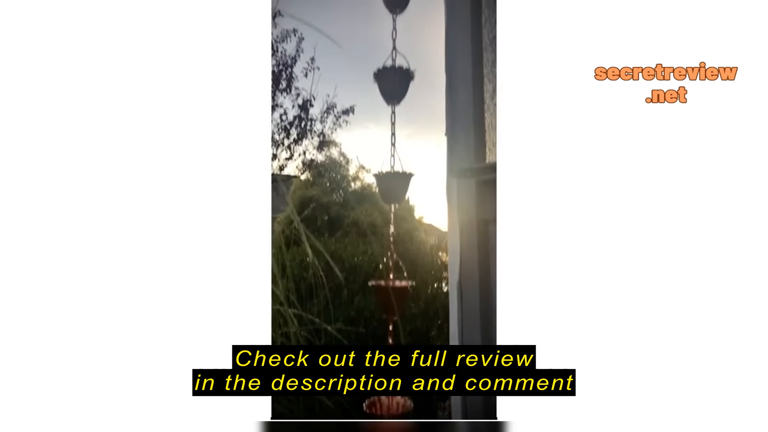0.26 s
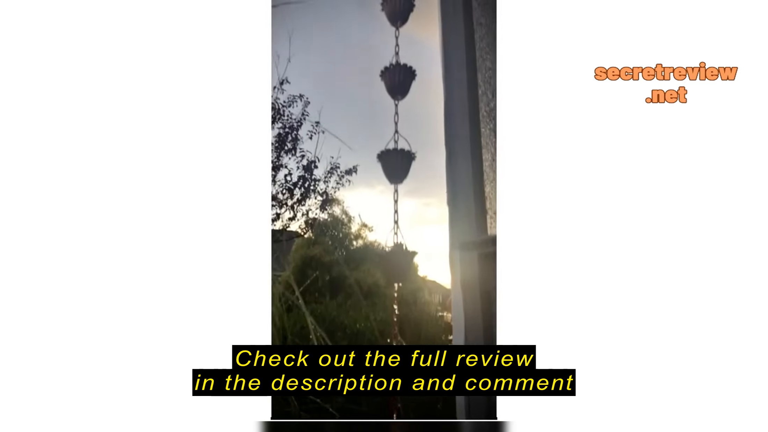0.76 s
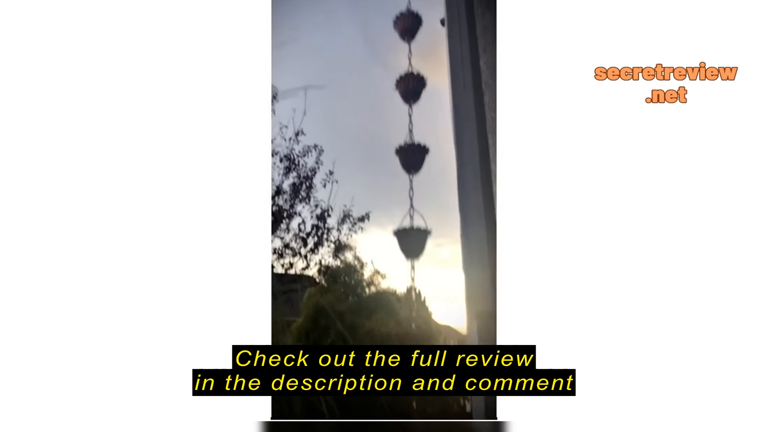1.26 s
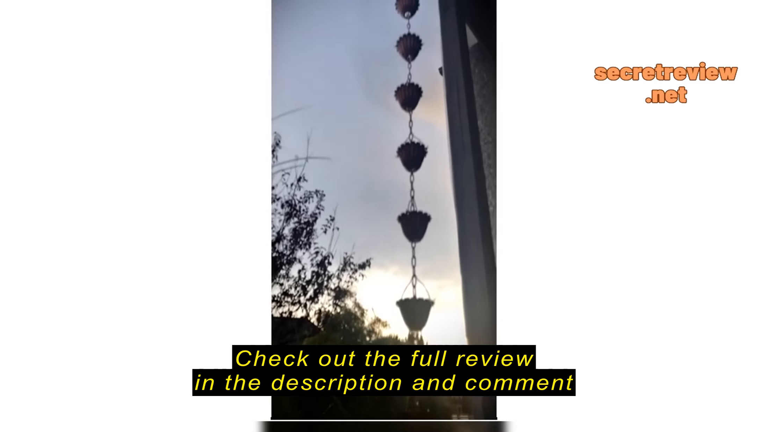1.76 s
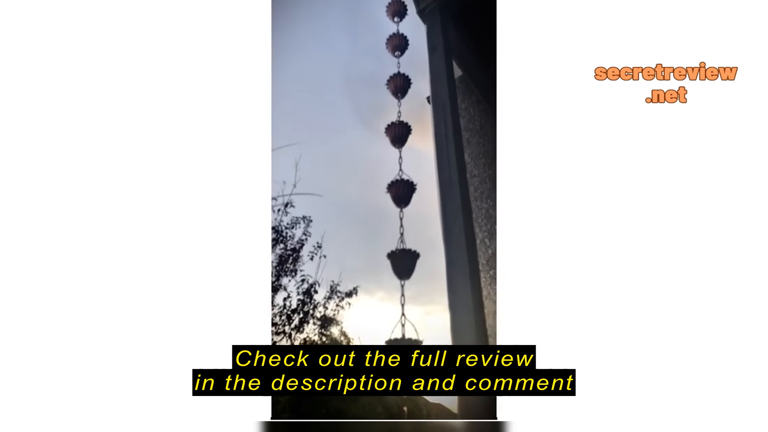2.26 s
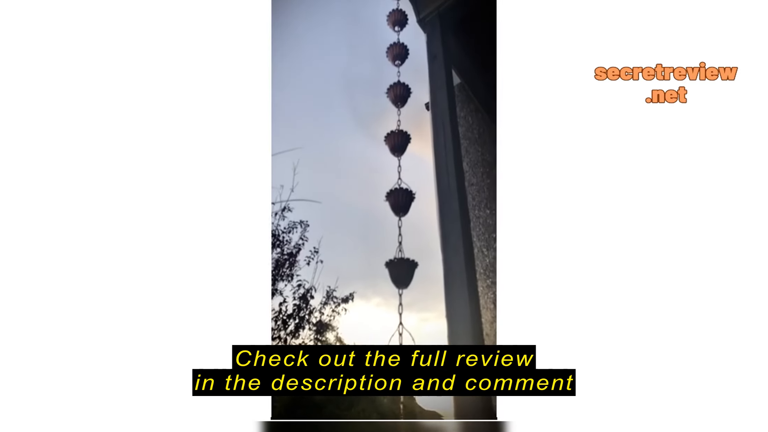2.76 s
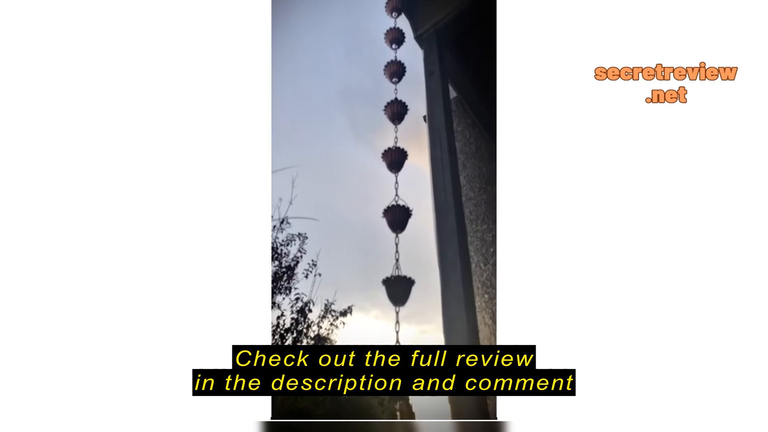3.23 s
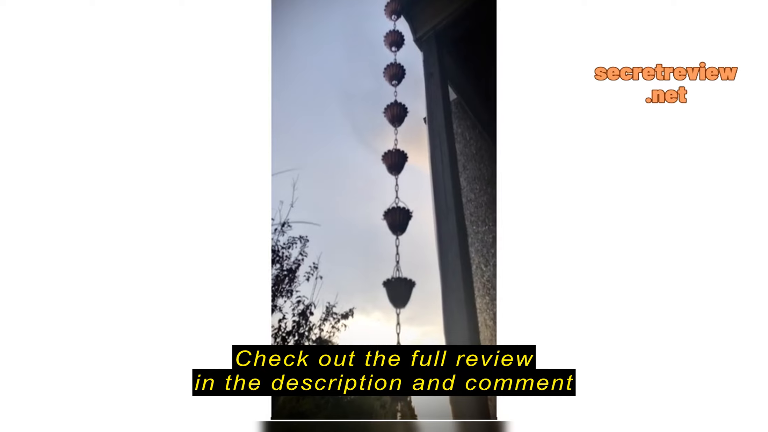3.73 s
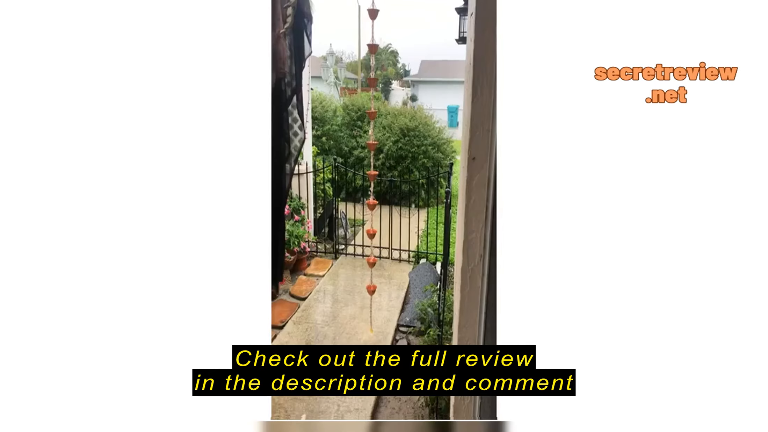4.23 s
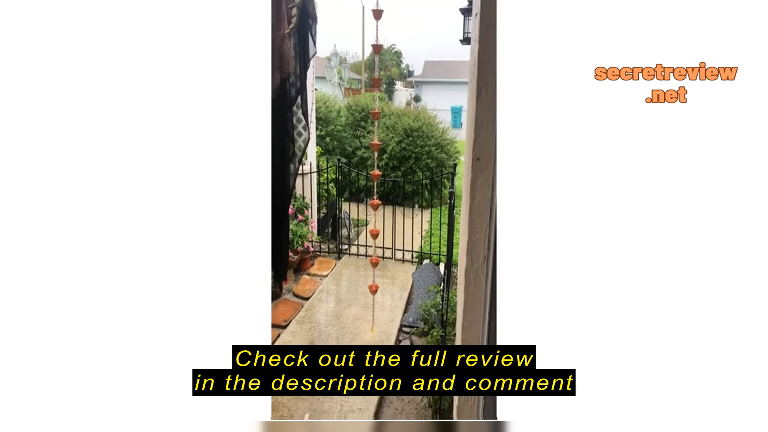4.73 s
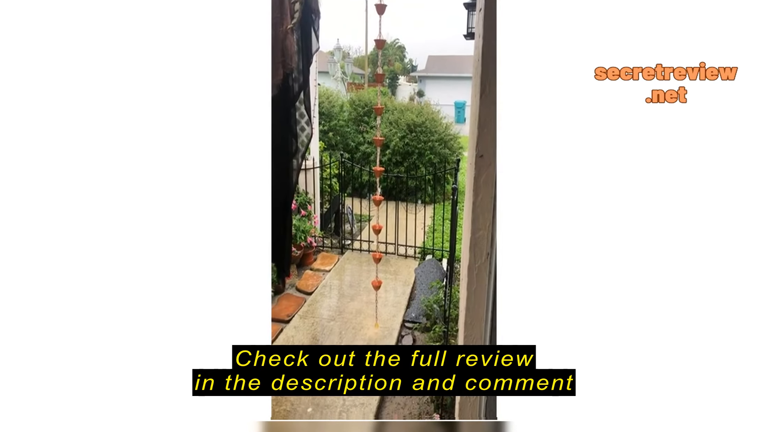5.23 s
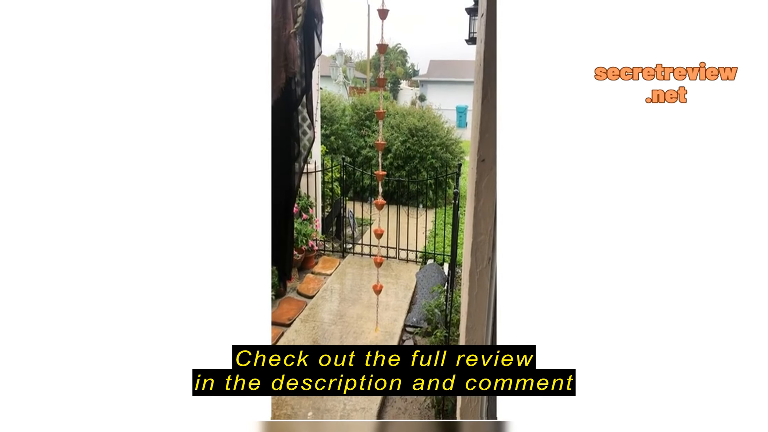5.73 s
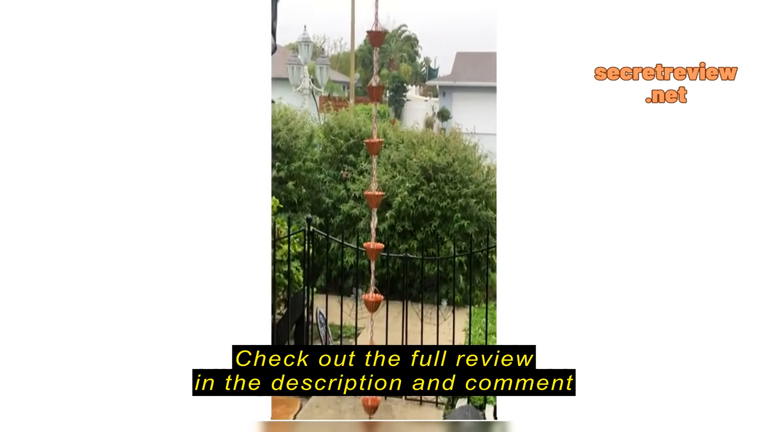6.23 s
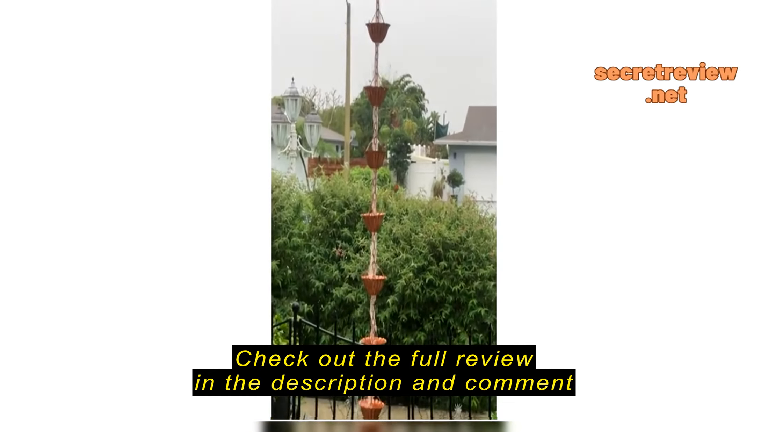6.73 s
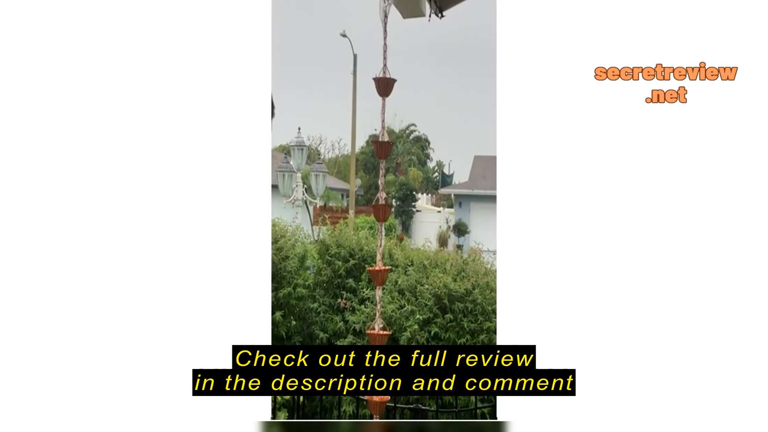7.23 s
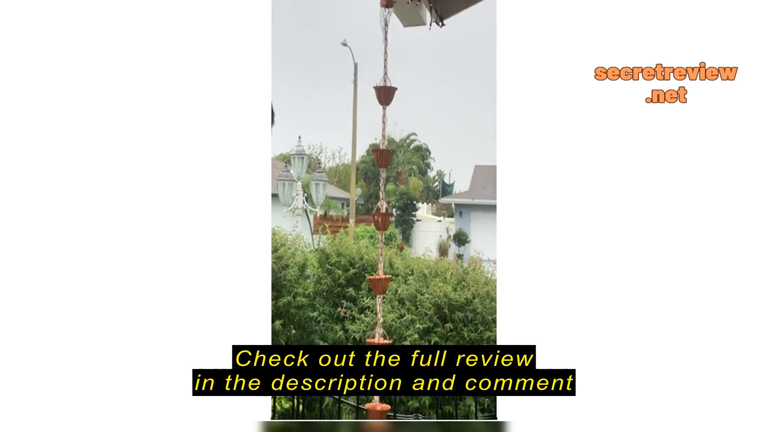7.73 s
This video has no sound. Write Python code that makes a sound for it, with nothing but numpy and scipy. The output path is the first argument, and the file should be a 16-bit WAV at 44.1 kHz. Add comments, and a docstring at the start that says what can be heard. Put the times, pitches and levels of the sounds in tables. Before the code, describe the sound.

Outdoors under the eaves, isolated drips plink into small copper cups with short upward chirps and tiny metallic ticks, over a soft far-off traffic murmur and faint machine tones. Around four seconds there is a very brief silence, then steady rain hiss starts at once, with water gurgling, pattering and splatting down the chain close by. An air conditioner hums low. The porch adds a short echo; identical sound in both channels.

```python
"""Single drips plink into the cups of a copper rain chain at a house's eaves, at dusk, over a far-off murmur.
After a short silence a second scene starts, in steady rain: water gurgles, spatters and splats down the chain.
Drips and drops are short decaying rings, many rising in pitch, and the porch walls echo them.
The murmur and the garden rain are filtered noise; distant machines and a nearby air conditioner are
unsteady tones. The microphone keeps neither the deepest rumble nor the extreme treble."""
import sys
import numpy as np
from scipy import signal
from scipy.fft import rfft, irfft
from scipy.io import wavfile
from scipy.ndimage import uniform_filter1d, map_coordinates

SR = 44100
rng = np.random.default_rng(int(sys.argv[2]) if len(sys.argv) > 2 else 0)


def inscribe(sig):
    """Save sig as 16-bit PCM at rate SR to the path in sys.argv[1].

    A 1-D sig is mono; a 2-D sig holds one channel per row.
    Samples are clipped to [-1, 1] before scaling.
    """
    pcm = np.round(np.clip(np.atleast_2d(sig).T, -1, 1) * 32767)
    wavfile.write(sys.argv[1], SR, pcm.astype(np.int16))


N = 351918
DUSK_END_S, RAIN_START_S = 3.988, 4.056
SHOWER_S = N / SR - RAIN_START_S
TOP_HZ = 15900  # upper limit of the microphone


def undb(db):
    """Decibels to gain."""
    return 10 ** (np.asarray(db) / 20)


def level(x, db):
    """Scale to an rms level in dB."""
    return x * undb(db) / np.sqrt(np.mean(x ** 2))


def rain_level(x):
    """Scale to a standard deviation of 1 over the time of the shower."""
    return x / np.std(x[int(RAIN_START_S * SR):])


def curve(rows):
    """Join (s, value) rows by straight lines."""
    return np.interp(np.arange(N) / SR, *np.transpose(rows))


def walk(rate):
    """Random levels held 1 / rate s and smoothed twice; spread near 1."""
    hold = int(SR / rate)
    steps = np.repeat(rng.standard_normal(N // hold + 1), hold)
    smooth = uniform_filter1d(uniform_filter1d(steps, hold), hold)
    return 1.301 * smooth[:N]


def colour(x, points):
    """Causal minimum-phase filter with the given (Hz, dB) response, built from its cepstrum."""
    hz, db = np.transpose(points)
    bins = np.maximum(np.arange(N // 2 + 1) * SR / N, 1)
    response_db = np.interp(np.log(bins), np.log(hz), db)
    cepstrum = irfft(np.log(undb(response_db)), N)
    # fold the backward half of time onto the forward half
    cepstrum[1:N // 2] *= 2
    cepstrum[N // 2 + 1:] = 0
    return irfft(rfft(x) * np.exp(rfft(cepstrum)), N)


def add(out, s, sound):
    """Mix a sound in at time s."""
    i = min(max(int(s * SR), 0), N)
    out[i:i + len(sound)] += sound[:N - i]


def grain(hz, cycles, glide, swell):
    """A ring under an envelope of peak 1 that swells and dies away, rising in pitch by the share glide."""
    hz = min(hz, .45 * SR)
    # age reaches 1 after the given number of cycles
    age = np.arange(int(2 * cycles * SR / hz) + 2) * hz / (SR * cycles)
    shape = age ** swell * np.exp(-2 * np.pi * age)
    return shape / shape.max() * np.sin(2 * np.pi * cycles * (age + glide * age ** 2 / 2))


def porch(x, t60, wet_db):
    """Direct sound, then the short dense echo of walls and roof, whose pattern shifts as the microphone sways."""
    t = np.arange(SR // 3) / SR
    sway = 2 * np.pi * np.cumsum(1 + .4 * walk(2)) / SR
    dull = signal.butter(1, min(9000, TOP_HZ), fs=SR, output="sos")
    echo = 0
    # four echo patterns take turns, about one round a second
    for k, noise in enumerate(rng.standard_normal((4, len(t)))):
        tail = noise * undb(-60 * t / t60) * (1 - np.exp(-t / 0.00056))
        tail = signal.sosfilt(dull, tail)
        share = np.maximum(np.cos(sway + k * np.pi / 2), 0)
        echo = echo + share * signal.oaconvolve(x, tail / np.linalg.norm(tail))[:N]
    return x + undb(wet_db) * echo


def hum(hz, db, wander_hz, waver_db):
    """One machine tone, unsteady in pitch and strength."""
    phase = np.cumsum(hz + wander_hz * walk(9)) / SR + rng.random()
    return np.sqrt(2) * undb(db + waver_db * walk(4.05)) * np.sin(2 * np.pi * phase)


# The neighbourhood at dusk, far from the porch. Each row: frequency in Hz, relative level in dB per Hz.
MURMUR_SPECTRUM = [(25, -13), (42, -7.5), (70, 2), (250, -5), (420, -9), (580, -14), (900, -13.5),
                   (1500, -20), (3200, -26.5), (5800, -30), (6200, -28), (6700, -33.5), (10000, -37),
                   (15000, -46.5)]


def neighbourhood():
    """Traffic far off blends into one noise, coloured by its spectrum and wavering in level."""
    murmur = level(colour(rng.standard_normal(N), MURMUR_SPECTRUM), db=-46.5)
    return murmur * undb(.4 * walk(5))


# Machines in the distance. Each row: pitch in Hz, level in dB at first, level in dB at the end of dusk,
# wander of the pitch in Hz.
FAR_TONES = [(118.6, -52.5, -54, 4.01), (1236, -80, -68, 1.04), (1286, -79, -76, 0.96), (5010, -83, -77, 2),
             (5200, -80, -80, 1.9)]
# A far-off whine that swells and fades. Each row: time in seconds, level in dB.
FAR_WHINE = [(0, -72), (2.3, -60.5), (2.6, -58), (3.0, -63), (3.27, -52.5), (3.55, -61.5), (3.8, -57),
             (4, -61.5)]


def distant_machines():
    """Far machines give unsteady tones that drift in strength, and one whine that comes and goes."""
    machines = 0
    for hz, first_db, last_db, wander_hz in FAR_TONES:
        db = curve([(0, first_db), (DUSK_END_S, last_db)])
        machines = machines + hum(hz, db, wander_hz, waver_db=2.0)
    return machines + hum(hz=379.0, db=curve(FAR_WHINE), wander_hz=4.47, waver_db=3.0)


# Rain on the garden, beyond the porch. Each row: frequency in Hz, relative level in dB per Hz.
RAIN_SPECTRUM = [(25, -15), (48, 2), (75, 4.5), (150, 5), (230, 0.5), (320, -2), (520, -2), (700, -4.5),
                 (1050, -7), (1600, -6), (2500, -8.5), (5200, -7.5), (7500, -12), (15500, -14)]


def garden_rain():
    """Countless drops merge into one noise, coloured by its spectrum and wavering in level."""
    rain = level(colour(rng.standard_normal(N), RAIN_SPECTRUM), db=-43.5)
    return rain * undb(.5 * walk(3.7))


# The walk through the porch. Each row: time in seconds, place (0 deep inside, 1 halfway, 2 at the edge).
PORCH_WALK = [(5.75, 0.023), (6.25, 0.76), (6.45, 1.3), (6.85, 1.9)]
# The air conditioner nearby. Each row: pitch in Hz, level in dB deep in the porch, in dB halfway,
# in dB at its edge, wander of the pitch in Hz, waver of the level in dB.
COOLER_TONES = [(58, -61, -73, -62, .3, -0.5), (60.3, -47.5, -67, -50.5, 0.33, -2),
                (94.5, -56, -49, -48, 0.57, 2.7), (119, -52.5, -52, -59, 1.29, 1.5),
                (185, -70, -70, -66, 1.1, 2), (240.8, -51.5, -53, -54.5, 0.31, -0.6),
                (261.2, -59.5, -61, -61.5, 1.24, -3), (284, -62, -60, -66, 0.88, 1.5),
                (362.2, -58.5, -51.5, -67, 1.15, 3)]
# The lower whine of its fan, swelling and fading. Each row: time in seconds, level in dB.
LOW_FAN_WHINE = [(4.06, -50.5), (4.3, -57.5), (4.5, -49), (4.75, -62), (4.95, -50.5), (5.4, -61),
                 (5.7, -57), (5.9, -55), (6.33, -50), (6.55, -64), (7.98, -70)]
# The higher whine of its fan. Each row: time in seconds, level in dB.
HIGH_FAN_WHINE = [(4.06, -59.5), (5.1, -58), (5.35, -71), (5.65, -57.5), (6.5, -57.5), (6.8, -69),
                  (7.2, -69), (7.45, -57), (7.98, -63)]


def air_conditioner():
    """The hum stands between the walls, so each tone has its own level from place to place."""
    place = curve(PORCH_WALK)
    cooler = 0
    for hz, *place_dbs, wander_hz, waver_db in COOLER_TONES:
        db = np.interp(place, np.arange(len(place_dbs)), place_dbs)
        cooler = cooler + hum(hz, db, wander_hz, waver_db)
    cooler = cooler + hum(hz=379, db=curve(LOW_FAN_WHINE), wander_hz=1.36, waver_db=1.6)
    return cooler + hum(hz=483.4, db=curve(HIGH_FAN_WHINE), wander_hz=0.89, waver_db=1.5)


def gurgle(hz, spread, cycles, db, scatter_db, surge_db, count):
    """Scattered bubbles and droplets that come in surges, each with its own pitch, length and size."""
    out = np.zeros(N)
    for (when, length), (pitch, size) in zip(rng.random((count, 2)), rng.standard_normal((count, 2))):
        ring = grain(hz * 2 ** (spread * pitch), cycles * (.5 + length), glide=0.12, swell=0.37)
        add(out, RAIN_START_S + when * SHOWER_S, undb(scatter_db * np.tanh(size / 2)) * ring)
    return undb(db) * rain_level(out * undb(surge_db * walk(14)))


def spatter(hz, octaves, cycles, scatter_db, lag_s, count, size=3):
    """Tiny splashes, each a few droplets close in time and pitch, all through the shower."""
    out = np.zeros(N)
    lead_s = .1  # the first splashes fall before the shower is heard
    for _ in range(count):
        when, pitch, length = rng.random(3)
        centre_hz = hz * 2 ** (octaves * (pitch - .5))
        gain = undb(scatter_db * np.tanh(rng.standard_normal() / 2))
        for late, detune in zip(rng.exponential(size=size), rng.standard_normal(size)):
            # droplets of one splash differ by about .11 octave
            droplet = grain(centre_hz * 2 ** (.11 * detune), cycles * (.5 + length), glide=0.085, swell=0.49)
            s = RAIN_START_S - lead_s + when * (SHOWER_S + lead_s) + lag_s * late
            add(out, s, gain * np.exp(-late / 2) * droplet)
    return rain_level(out)


# The ring of small drops on the wet cups. Each row: frequency in Hz, relative level in dB per Hz.
CUP_RING = [(800, -34), (1600, -3), (2600, -6.5), (3600, -1.5), (4200, -3), (5000, 4.5), (6000, 4),
            (7300, -9), (15500, 0)]


def cups(x):
    """The wet cups ring with the drops, sliding in pitch as they fill and empty."""
    drift, drift_rate_hz = .04, 7  # drift is a share of the pitch
    slide = np.cumsum(1 + drift * walk(drift_rate_hz))
    return rain_level(map_coordinates(colour(x, CUP_RING), [slide], order=3, mode="mirror"))


def flow(trickle_db, edge_db, spills):
    """Strength of the water on the chain: a steady trickle, and (s, dB) spills that swell and drain away."""
    rise_s, drain_s = 0.021, 0.021  # widths of the two bell-shaped flanks
    t = np.arange(N) / SR
    coarse = t[::64]
    power = 0
    for s, db in spills:
        flank = np.maximum((s - coarse) / rise_s, (coarse - s) / drain_s)
        power = power + (undb(db) * np.exp(-flank ** 2 / 2)) ** 2
    trickle = undb(np.interp(curve(PORCH_WALK), [0, 2], [trickle_db, edge_db]))
    return np.sqrt(trickle ** 2 + np.interp(t, coarse, power))


# The cups brim over several times a second. Each row: height of the spill in seconds, level in dB of the
# patter on the cups, level in dB of the fine fizz; both add to the trickle.
CUP_SPILLS = [(4.08, -46.5, -48), (4.305, -55, -47.5), (4.405, -54, -47.5), (4.585, -51, -47),
              (4.77, -51, -48), (5.09, -49, -45.5), (5.38, -56, -43.5), (5.465, -48, -46),
              (5.59, -55, -47.5), (5.75, -49, -45), (6.1, -48, -43), (6.215, -54, -48), (6.325, -49.5, -52),
              (6.43, -53, -46.5), (6.6, -52, -48.5), (6.81, -61, -53), (7.13, -50, -48), (7.34, -55, -49),
              (7.46, -49, -51), (7.535, -50, -43), (7.64, -54, -50), (7.92, -51, -50)]


def spilling_water():
    """Water patters on the ringing cups and fizzes in fine droplets, stronger with each spill."""
    patter = cups(spatter(hz=4020, octaves=2.0, cycles=6, scatter_db=11, lag_s=.003, count=1300))
    fizz = spatter(hz=10660, octaves=1.14, cycles=14, scatter_db=9, lag_s=.002, count=1600)
    # the trickle is a little stronger at the edge of the porch, nearer the chain
    patter_flow = flow(trickle_db=-56.5, edge_db=-55, spills=[(s, db) for s, db, _ in CUP_SPILLS])
    fizz_flow = flow(trickle_db=-56.5, edge_db=-53, spills=[(s, db) for s, _, db in CUP_SPILLS])
    return patter * patter_flow + fizz * fizz_flow


STRAY_DB = -33  # peak of the extra drops


def strays(count):
    """Further soft drops at random moments and pitches, as rows like those of the bursting drops."""
    rows = []
    for when, pitch in zip(rng.random(count), rng.standard_normal(count)):
        hz = 7900 * 2 ** (.43 * pitch)
        rows.append((RAIN_START_S + when * SHOWER_S, STRAY_DB, hz, 21, -13))
    return rows


# Drops bursting on the chain, loud and soft. Each row: start in seconds, peak in dB, pitch in Hz,
# cycles that it rings, level of the spray in dB relative to the drop.
BURSTING_DROPS = [(4.132, -36, 5800, 18, -14), (4.1652, -28, 14020, 24, -14), (4.2585, -30, 5000, 8.9, -7),
                  (4.268, -29, 11000, 8, -5), (4.3004, -31, 5640, 7, -12), (4.315, -27.5, 9500, 7, -6),
                  (4.457, -29, 10500, 16, -8), (4.461, -29, 14000, 24, -9), (4.591, -31, 9500, 12, -7),
                  (4.7036, -27.5, 5580, 10, -3), (4.705, -28, 10000, 7, -6), (4.772, -29.5, 5750, 12, -9),
                  (4.7793, -29, 5750, 9.3, -13), (4.78, -27, 12500, 12, -8), (4.8172, -31, 4980, 5, -7),
                  (4.941, -33, 5760, 14, -13), (5.0527, -28.5, 14500, 30, -12), (5.079, -26, 14500, 12, -7),
                  (5.087, -30, 8000, 9.1, -9), (5.094, -29, 5897, 8, -7), (5.098, -28, 10500, 10, -7),
                  (5.2177, -15.5, 5750, 8.3, -17), (5.218, -23, 9800, 16, -4),
                  (5.2199, -14, 5560, 8.4, -19), (5.2197, -27.5, 2350, 6, -5),
                  (5.2215, -22.5, 3700, 5.6, -7), (5.2273, -29, 4800, 8.6, -10),
                  (5.2355, -26, 6200, 6, -13), (5.236, -29.5, 3100, 4.4, -4), (5.263, -36, 7020, 7, -3),
                  (5.2878, -29, 14100, 42, -12), (5.349, -24, 12000, 8, -3), (5.358, -28, 9200, 14, -8),
                  (5.3775, -19, 5700, 9.5, -22), (5.3815, -26, 9000, 7, -11), (5.4423, -30, 14500, 14, -6),
                  (5.444, -30.5, 3700, 7.7, -9), (5.578, -30, 5300, 7, -7), (5.664, -38, 8400, 28, -16),
                  (5.673, -33, 4200, 10, -12), (5.7271, -27.5, 5100, 16, -7), (5.748, -31, 9505, 8, -7),
                  (5.755, -25, 5640, 7, -12), (6.0579, -32, 11780, 20, -7), (6.0875, -17, 5200, 5.2, -17),
                  (6.088, -24, 10900, 16, -17), (6.19, -23, 12500, 9, -12), (6.214, -26, 12500, 10, -8),
                  (6.223, -33.5, 4600, 8, -9), (6.2838, -26.5, 8600, 12, -16),
                  (6.2845, -27, 12500, 16, -14), (6.3936, -32, 11500, 12, -3), (6.42, -32.5, 5500, 16, -10),
                  (6.5937, -31, 5300, 8, -18), (6.612, -27.5, 5300, 13, -4), (6.7014, -27.5, 5850, 9, -12),
                  (6.9714, -31.5, 5990, 14, -6), (6.985, -33, 10000, 18, -3), (7.0471, -25, 6500, 13, -6),
                  (7.0485, -28, 10600, 11, 0), (7.191, -31, 9500, 13, -10), (7.23, -31, 3670, 10, -14),
                  (7.279, -23.5, 5724, 11, -15), (7.3648, -25, 13700, 28, -13),
                  (7.3649, -27.5, 6340, 6, -12), (7.4672, -33, 7570, 26, -14), (7.511, -20, 4840, 3.8, -14),
                  (7.5115, -33, 2380, 9.3, -7), (7.513, -19.5, 12500, 14, -9), (7.5262, -28, 5040, 7, -6),
                  (7.543, -28, 10000, 16, -12), (7.644, -30, 6300, 13, -9), (7.645, -32, 11500, 18, -10),
                  (7.7745, -29, 3480, 8.3, -9), (7.7752, -27, 5740, 11.6, -8), (7.779, -24.5, 5600, 9, -16),
                  (7.7925, -35, 4380, 7.1, -16), (7.863, -27.5, 10500, 8, -10)]


def splats(spray_s, count):
    """A drop smacks the copper or bursts with a short ring; its spray lands after it, ever fainter."""
    out = np.zeros(N)
    for s, db, hz, cycles, spray_db in list(BURSTING_DROPS) + strays(count=10):
        add(out, s, undb(db) * grain(hz, cycles, glide=0.036, swell=0.48))
        # a louder drop throws its spray farther: the flight time doubles every 18 dB
        flight_s = spray_s * 2 ** ((db - STRAY_DB) / 18)
        for late, pitch in zip(rng.exponential(size=count), rng.standard_normal(count)):
            droplet = grain(hz * 2 ** (.21 * pitch), cycles, glide=0.17, swell=0.57)
            add(out, s + flight_s * late, undb(db + spray_db - 4.7 * late) * droplet)
    return out


def faint_drips(count):
    """Faint drips higher up the chain at random moments, as rows like those of the drips into the cups."""
    rows = []
    for when, pitch in zip(rng.random(count), rng.standard_normal(count)):
        rows.append((when * DUSK_END_S, 5350 * 2 ** (.47 * pitch), -53.5, 15, .19, -6))
    return rows


# Drips into the cups at dusk. Each row: start in seconds, pitch of the bubble in Hz, peak in dB,
# cycles that it rings, rise in pitch as a share, level of the second bubble in dB relative to the first.
CUP_DRIPS = [(.202, 10100, -46, 32, 0.14, -16), (.341, 1070, -46.5, 28, .04, -21),
             (.384, 6500, -37, 17, 0.18, -4.5), (.398, 3480, -44, 13, .1, -5),
             (.402, 4600, -45, 12, .15, -5), (.4165, 3680, -44, 17, 0.17, -3),
             (.429, 3020, -45, 31, 0.06, -11), (.474, 1270, -49, 8.9, 0.06, 2),
             (.493, 2870, -44, 8.3, .15, 1), (.508, 3550, -46, 9, .2, 0), (.539, 3500, -48, 9, .2, -3),
             (.605, 6400, -51, 24, .1, -12), (.648, 1670, -50, 40, 0.05, -22),
             (.668, 1060, -43, 15.3, 0, -14), (1.531, 3660, -43, 14, 0.24, -12),
             (1.666, 6400, -47, 18, .1, -8), (1.852, 1594, -41.5, 8.9, .18, -1),
             (1.8545, 2150, -46, 13, .15, -12), (2.069, 3700, -47, 14, .1, -14),
             (2.075, 6000, -44.5, 22, 0.16, -17), (2.2413, 5910, -39.5, 8.7, 0.4, -10),
             (2.18, 1850, -49, 12, .12, -9), (2.246, 2300, -50, 12, .12, -6),
             (2.303, 3100, -50, 14, .12, -8), (2.335, 1020, -47, 19, 0, -10),
             (2.428, 3000, -54, 15, .12, -10), (2.5561, 2650, -45, 17, 0.1, -14),
             (2.6565, 2750, -39, 11, 0.22, -9), (2.659, 3550, -43.5, 19, 0.23, -17),
             (2.875, 3590, -49, 16, 0.1, -8), (3.2686, 5877, -41.5, 16, 0.2, -1),
             (3.36, 2300, -51, 12, .12, -9), (3.58, 2950, -52, 16, .1, -14),
             (3.5808, 3720, -43.5, 16, 0.14, -2)]
# Droplets that tick on bare copper. Each row: start in seconds, peak in dB, pitch in Hz, cycles that it rings.
COPPER_TICKS = [(.2215, -48, 14200, 30), (.2245, -45, 14000, 24), (.384, -41, 14000, 8),
                (.8315, -36, 13000, 2.4), (.8325, -37, 6000, 1.7), (1.22, -58, 14000, 6),
                (1.463, -60, 14500, 18), (1.491, -45, 6300, 5), (2.15, -49, 12500, 3),
                (2.31, -55, 14500, 10), (1.735, -44, 13030, 3), (2.42, -47, 13000, 3),
                (3.16, -41, 11870, 2.4)]


def dripping_chain():
    """Each drip ticks as it lands and traps two bubbles, most chirping upward; droplets tick on bare copper."""
    drips = np.zeros(N)
    for s, hz, db, cycles, glide, second_db in list(CUP_DRIPS) + faint_drips(count=12):
        landing_tick = grain(1.6 * hz, cycles=2.9, glide=0, swell=1.0)
        add(drips, s, undb(db - 0.5) * landing_tick)
        add(drips, s, undb(db) * grain(hz, cycles, glide, swell=1.0))
        # a smaller, higher bubble pinches off five cycles later
        add(drips, s + 5 / hz, undb(db + second_db) * grain(1.194 * hz, cycles, glide, swell=1.0))
    for s, db, hz, cycles in COPPER_TICKS:
        add(drips, s, undb(db) * grain(hz, cycles, glide=0, swell=1.9))
    return drips


def running_chain():
    """Water spills and splats from cup to cup, over bubbles whose size sets their pitch."""
    chain = spilling_water() + splats(spray_s=.006, count=7)
    # large bubbles in the filled cups, smaller ones at their rims, then lone droplets on the links
    chain += gurgle(hz=1608, spread=0.19, cycles=16.7, db=-56, scatter_db=2.5, surge_db=2.0, count=600)
    chain += gurgle(hz=3640, spread=0.11, cycles=15.3, db=-60.5, scatter_db=5, surge_db=1.0, count=350)
    chain += gurgle(hz=5150, spread=0.18, cycles=14, db=-61.5, scatter_db=7.0, surge_db=2.2, count=500)
    chain += gurgle(hz=9170, spread=0.12, cycles=27, db=-60.5, scatter_db=6, surge_db=2.0, count=450)
    return chain


def dusk():
    """The dripping chain with a brief porch echo, before the distant murmur and machines."""
    return neighbourhood() + distant_machines() + porch(dripping_chain(), t60=0.078, wet_db=-5)


def shower():
    """The running chain under the porch roof, rain beyond it and the air conditioner's hum."""
    return garden_rain() + air_conditioner() + porch(running_chain(), t60=0.16, wet_db=-3)


def scene():
    """Dusk fades quickly and the shower starts at once; both channels carry the same sound."""
    t = np.arange(N) / SR
    dusk_fade = np.clip((DUSK_END_S - t) / 0.0091 + .5, 0, 1)
    shower_fade = np.clip((t - RAIN_START_S) / 0.0024, 0, 1)
    sound = dusk() * dusk_fade + shower() * shower_fade
    return np.array([sound, sound])


def record(dry):
    """The microphone cuts the deepest rumble gently and the extreme treble steeply."""
    rumble_cut = signal.butter(2, 30, "highpass", fs=SR, output="sos")
    treble_cut = signal.ellip(10, .2, 70, TOP_HZ, fs=SR, output="sos")
    return signal.sosfilt(treble_cut, signal.sosfilt(rumble_cut, dry))


dry = scene()
out = record(dry)
inscribe(out)
```